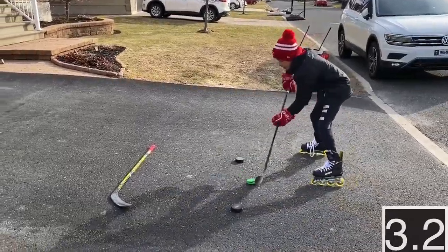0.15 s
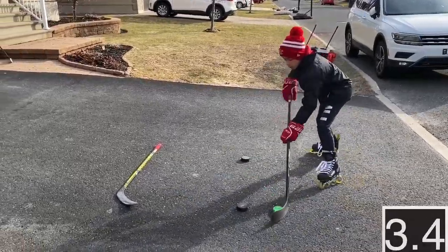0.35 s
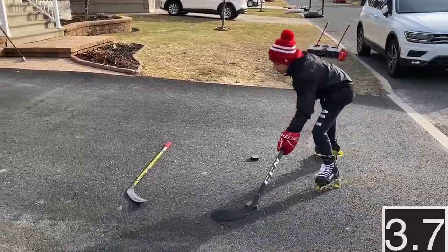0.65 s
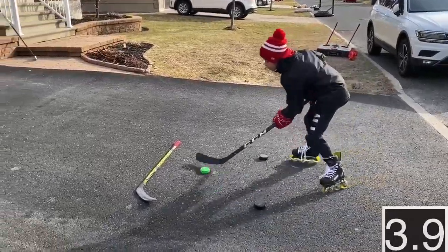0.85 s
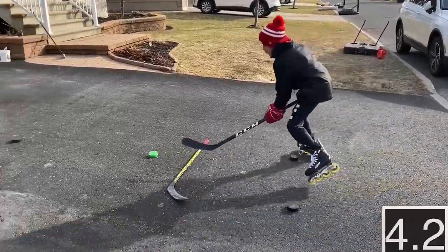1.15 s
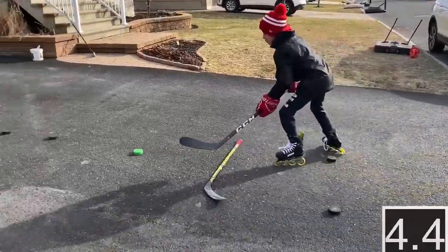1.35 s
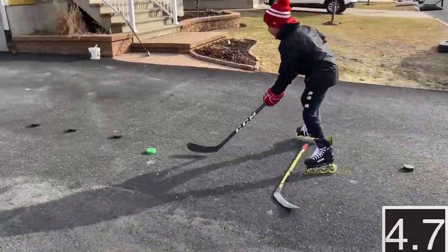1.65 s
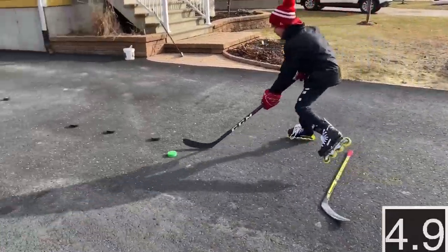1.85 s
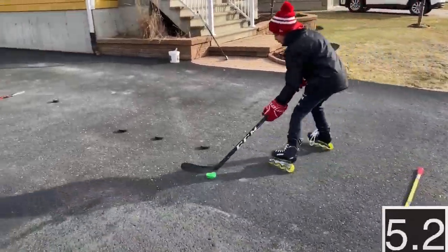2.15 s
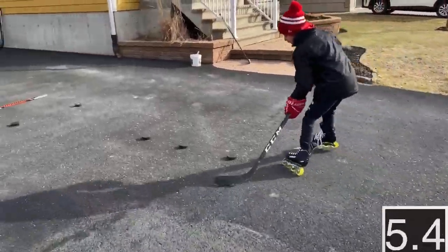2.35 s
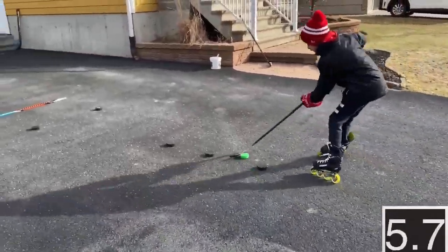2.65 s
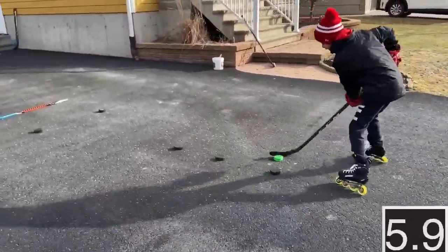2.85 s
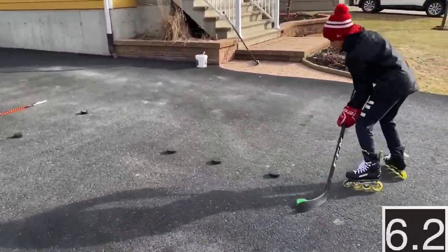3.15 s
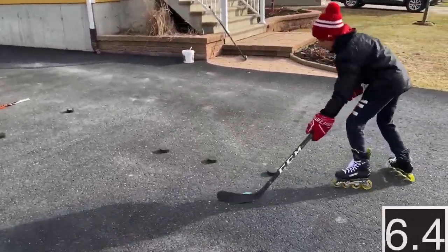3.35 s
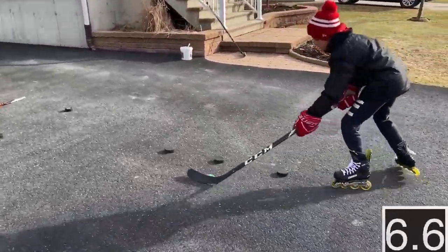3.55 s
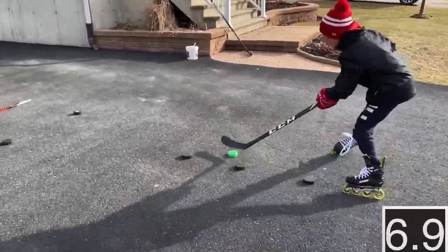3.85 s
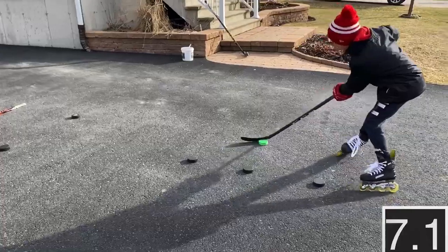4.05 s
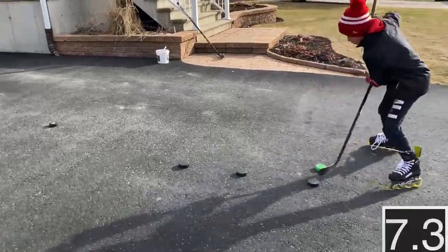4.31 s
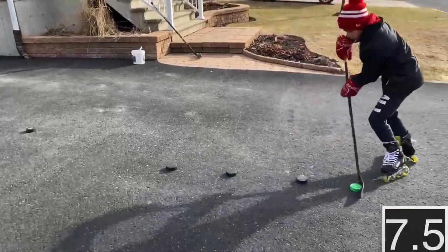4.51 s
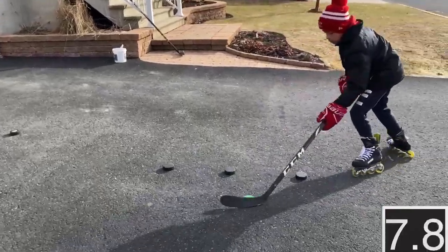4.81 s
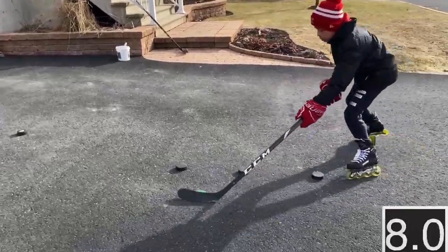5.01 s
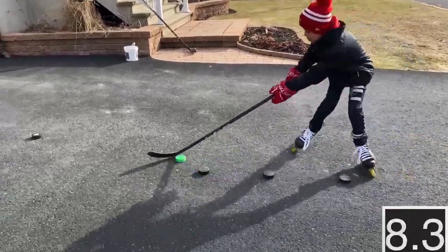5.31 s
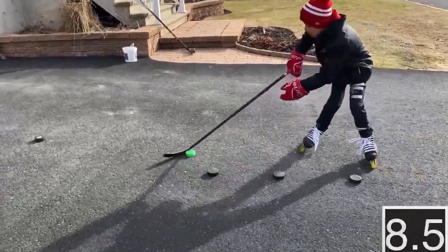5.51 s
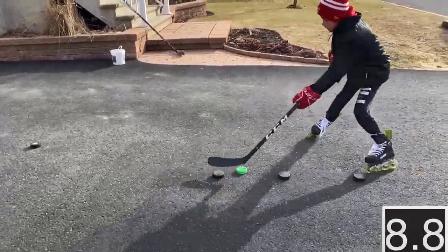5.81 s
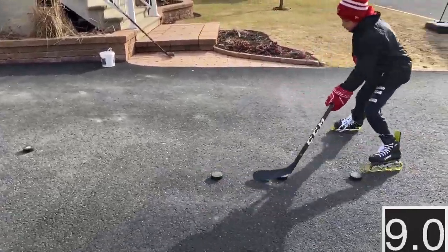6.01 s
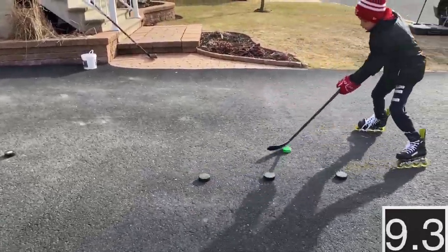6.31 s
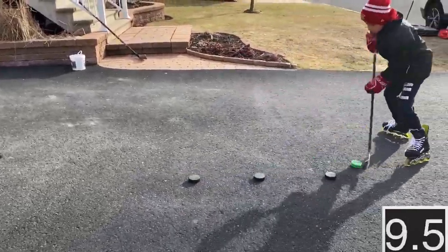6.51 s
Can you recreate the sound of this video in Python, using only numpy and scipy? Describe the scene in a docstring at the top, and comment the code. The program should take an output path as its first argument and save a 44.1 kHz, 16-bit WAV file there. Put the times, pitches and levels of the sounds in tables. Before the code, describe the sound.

Stickhandling on a paved driveway: uneven woody clacks and brighter plastic clicks, each with a tiny chatter of rebounds and a little grit, then skipping scrapes of the blade edge. Puck rattle continues quietly throughout. Wind puffs lightly, except for one booming double buffet near two seconds. The last moments bring a short loud rattle and a gritty crack. Close, dry outdoor sound on a handheld stereo phone.

```python
"""A loose plastic puck rattles over gritty asphalt, with faint wheel rumble and wind around it.
Blade, puck or both then knock and clack, and a skater's blade scrapes over the grit, a few metres from a
hand-held phone. Random contacts ring banks of resonances for puck, wheels, blade and grit; shaped noise
and short slaps make the gusts at the two microphone ports, and a noise tail makes a short echo.
"""
import sys
import numpy as np
from scipy import signal
from scipy.fft import rfft, irfft, next_fast_len
from scipy.io import wavfile
from scipy.ndimage import uniform_filter1d

SR = 44100
rng = np.random.default_rng(int(sys.argv[2]) if len(sys.argv) > 2 else 0)


def unload_audio(sound):
    """Save the sound as a 16-bit wav file, at the path given as the first command line argument."""
    columns = np.transpose(np.atleast_2d(sound))
    # keep every value between -1 and 1, then stretch to whole-number steps
    steps = np.round(np.clip(columns, -1, 1) * 32767)
    wavfile.write(sys.argv[1], SR, steps.astype(np.int16))


N = 294147

# Sliding puck, interpolated over time: start_s, rattle_db, grit_db
SLIDE = [(0.0, -39, -47.5), (.75, -40.5, -49.5), (.9, -52, -47), (1.07, -53, -66), (1.2, -42, -49.5),
         (1.6, -48, -56), (2.2, -45, -54), (2.95, -44, -48.5), (3.45, -43.5, -53), (4.25, -45, -47.5),
         (5.3, -40, -51.5), (5.85, -49.5, -58.5), (6.1, -44.5, -53), (6.29, -45.5, -52), (6.33, -30, -39.5),
         (6.41, -46.5, -45), (6.67, -60, -71)]
# Puck jolting over a stone: start_s, level_db
JOLTS = [(0.75, -17), (0.7622, -13), (0.7837, -18), (0.803, -26), (1.7954, -22.5), (1.88, -13.5),
         (2.498, -21.5), (2.9477, -16.5), (3.027, -23.5), (3.355, -16), (3.7673, -20.5), (4.146, -18),
         (4.1832, -17.5), (4.4054, -23), (5.0865, -17), (5.128, -20), (5.354, -20), (5.543, -28),
         (5.571, -22), (5.592, -22), (5.628, -26), (5.861, -24), (6.391, -23)]
# Wind on the ports, interpolated over time: start_s, level_db
GUSTS = [(0.0, -40), (0.45, -51.5), (0.52, -36), (0.69, -50), (0.8, -47), (1.28, -45), (1.62, -44.5),
         (1.78, -28), (1.97, -15), (2.01, -6), (2.035, -21), (2.06, -7), (2.12, -29.5), (2.3, -49),
         (2.64, -54.5), (2.77, -31), (2.87, -30.5), (2.93, -31), (2.97, -35), (3.02, -33.5), (3.06, -48),
         (3.53, -39.5), (3.6, -57), (4.03, -44), (5.11, -51), (5.16, -35), (5.23, -43.5), (5.68, -52.5),
         (5.84, -32), (5.96, -39), (6.02, -39), (6.08, -52.5), (6.67, -43.5)]
# Knocks of blade, puck or both: start_s, knock_db, then crack_db, puck_db, edge_db (all re knock, before
# the mix gains), pitch_hz (the struck spot sets which blade modes are loudest)
KNOCKS = [(.081, -34.5, 17, 24, 23.5, 630), (.172, 0, -11.5, 0, -35, 1330),
          (.176, -7, -7.5, 0.5, -30, 1800), (.235, -7.5, -2, 9.5, -24, 1200),
          (.539, -25, -30, -20, -13, 450), (.641, -9, -22, -12, -14, 1100),
          (0.653, -5.5, -27, 0.5, -13, 3700), (.669, -22, -20, -15, -10, 1900),
          (0.678, -14, -16, -17, 5, 2600), (0.829, 0.5, -17, -19, -8, 1720),
          (.854, -10, 2.5, 10.5, 13, 680), (1.095, -23, 6.5, 21.5, 27.5, 1000),
          (1.2, -30, 0, -1, 22.5, 1800), (1.297, -22.5, -34, -29, -25, 250), (1.67, -13, -17, 7, -29, 680),
          (1.712, -18.5, -27, -2, 5.5, 2000), (1.921, -7, -12, -28, -1.5, 1600),
          (2.174, 0, -16.5, -23, -8, 1350), (2.209, -1, -9, 1, -26, 960), (2.533, -10, -13, 0, -30, 1050),
          (2.561, -6, -7.5, 11, 6.5, 1660), (2.628, -9.5, -19.5, 2, -11, 3400),
          (3.074, -0.5, -16, -30, -27, 1870), (3.078, -1, -9.5, -24, -35, 1300),
          (3.125, 0.5, -8, -33, -35, 1170), (3.324, -15.5, -11, 9, -19, 1460),
          (3.328, -17.5, -17, 12, -23, 1300), (3.368, -22, -12, 14, -15, 890),
          (3.896, -3, -13.5, 4.5, -34, 950), (3.955, -6, -8.5, 4, -27, 1040),
          (4.343, -6, -10.5, -35, -22, 1060), (4.351, -11, -4.5, -18, -21, 800),
          (4.39, -19.5, -15, -24, -4, 360), (4.429, -5, -0.5, 9, -8, 1230), (5.272, -11, -1, 10, -25, 1300),
          (5.322, -10.5, -10, 10.5, -28, 1130), (5.904, -5, -8.5, 7, -32, 1900),
          (5.945, -8.5, -23, -8, -25, 1700), (5.985, -14.5, -29, -17, -25, 1200),
          (6.218, -7, -14, -33, -37, 1000), (6.262, -13, -1, 9, -22, 1000), (6.479, -25.5, 3.5, 3, 4, 1300),
          (6.552, -15.5, -9, -29, 2, 840), (6.565, -22.5, 0, -20, 6, 970), (6.577, -18.5, -13, -20, 3, 750),
          (6.593, -4, -4, -36, 3.5, 980)]
# Blade dragged over asphalt: land_s, lift_s, scrape_db, swell_db (rise up to the lift), grit_db (re scrape)
STROKES = [(0.231, 0.385, -41.5, 5.5, -4), (0.454, 0.678, -36.5, 17, -17), (0.827, 0.885, -31.5, 2, -13),
           (1.773, 1.898, -48.5, 11, -1.5), (2.194, 2.209, -36, 7, -12), (2.227, 2.299, -25, 1.5, -10),
           (2.62, 2.863, -40.5, 12, -10.5), (3.07, 3.121, -36, 1, -6.5), (3.152, 3.269, -34.5, 0.5, -8.5),
           (3.385, 3.448, -35, 4.5, -8), (3.489, 3.704, -34, 4, -8.5), (3.993, 4.122, -35.5, 14.5, -11.5),
           (3.931, 3.958, -46, 8, -10), (4.375, 4.409, -50, 18.5, -4), (4.452, 4.624, -36, 2.5, 1),
           (4.737, 4.848, -37.5, 2, -7), (4.855, 5.02, -33.5, 8, -12), (5.371, 5.485, -50, 11, -10),
           (5.902, 5.959, -33, 0.5, -6), (5.976, 6.02, -32, 1.5, -13), (6.313, 6.406, -52.5, 1, -7),
           (6.552, 6.585, -34.5, -13, 4), (6.606, 6.672, -40, -1, 3)]

# Resonances of each body: pitch_hz, width_hz, level_db (re the other modes)
PUCK_MODES = [(2185, 364, 12.5), (2465, 223, 15), (2534, 86, 14), (3830, 680, 4), (5090, 460, 4),
              (7220, 74, -2.5)]
GRIT_MODES = [(4184, 556, 7.5), (4920, 2900, 3.5), (8300, 2580, 5.5), (9730, 2780, 5.5), (10840, 2500, 3),
              (13340, 2600, -4.5)]
WHEEL_MODES = [(165, 300, -7), (305, 124, 2.5), (675, 440, 2.5), (1070, 2200, -6.5)]
WIND_MODES = [(44.6, 28.8, -2.5), (77, 47.2, -0.5), (142.3, 83, -5.5), (204.6, 127, -12.5),
              (298, 92, -20.5)]
# Sharp slaps of air within a gust: pitch_hz, width_hz, level_db
BUFFET_MODES = [(181, 146, 0), (332, 287, -6)]
BLADE_MODES = [(300, 124, 0), (570, 248, -2), (937, 305, -0.5), (1171, 208, 2.5), (1409, 306, 2),
               (1680, 380, -0.5), (2070, 375, -1), (3220, 470, -10), (4740, 440, -15)]
# Hard blade edge: pitch_hz, width_hz, level_db
EDGE_MODES = [(2720, 240, 0.5), (3130, 270, -1.5), (3655, 245, 4), (5300, 150, -25), (7330, 140, -13)]
# Brittle top of the crack: pitch_hz, width_hz, level_db
SNAP_MODES = [(13000, 1530, 0)]

# Phase between the ports: pitch_hz, left_lead_rad
PORT_PHASE = [(0, 0), (900, -.2), (1500, -.7), (3000, -1.6), (5500, -.5), (6700, .2), (8400, 2.6),
              (9500, 3.4), (12200, 6.3), (15000, 9.3)]
# Level between the ports: pitch_hz, left_minus_right_db
PORT_BALANCE = [(300, 1.5), (800, 2.5), (2400, 2.5), (4400, -2.5), (8000, 0.5)]

JOLT_GRIT_DB = -8
WHEELS_DB = -50.5
BUFFET_DB = -8  # slaps re gust
BUFFET_TOP_DB = -27.5  # slaps grow with the gust only up to this level; beyond it the gust deepens
CHATTER_T60_S, SPRAY_S = 0.032, 0.0059
SPOT_DB_PER_OCTAVE2 = 3  # blade modes away from the struck spot's pitch ring less
SPOT_DETUNE = 0.086  # the grip detunes the modes by this relative spread
LAND_DB, LAND_S = 8, 0.066  # the blade bites harder just after it lands
LIFT_DB, TRAIL_DB_PER_S = 15.5, 119  # the scrape drops at the lift, then trails away
HOPS_PER_S, HOP_S = 95, 0.0045  # mean skipping rate; decay time of each bite
SKIP_SHARE, SETTLE = 0.72, 0.55  # depth of the skipping; share of it lost along the stroke
GRIT_SWELL_DB = 3.5  # the hiss grows faster than the scrape as the blade gathers speed
BEARING_LOW_HZ, BEARING_HIGH_HZ, BEARING_RAD = 1950, 7180, 1
ECHO_T60_S, ECHO_DB, ECHO_TOP_HZ = 0.091, -14, 4100
DIP_HZ, DIP_SHARE = 2880, 0.26  # the phone hears less here
TOP_HZ = 16600


def undb(db):
    """Turn decibels into an amplitude factor."""
    return 10 ** (np.asarray(db) / 20)


def unit(x):
    """Scale a sound to an RMS level of 1."""
    return x / np.sqrt(np.mean(x ** 2))


def curve(rows):
    """Read the columns of a timed table at every sample, with straight lines between rows."""
    s, *columns = np.transpose(rows)
    return [np.interp(np.arange(N) / SR, s, c) for c in columns]


def smooth_twice(x, size):
    """Average over a sliding window, twice, for soft corners."""
    return uniform_filter1d(uniform_filter1d(x, size=size), size=size)


def ring(x, modes):
    """A body: resonances side by side with alternating sign; a lone click peaks near 1."""
    def body(v):
        total = 0
        for k, (hz, width_hz, db) in enumerate(modes):
            b, a = signal.iirpeak(hz, hz / width_hz, SR)
            total = total + (-1) ** k * undb(db) * signal.lfilter(b, a, v)
        return total
    return body(x) / np.abs(body(signal.unit_impulse(1 << 12))).max()


def clicks(per_s, spread_db, size=N):
    """Random contacts of either sign; a wide spread makes a few far stronger than the rest."""
    hit, strength, sign = rng.random((3, size))
    level = undb(-spread_db * np.log(1 - 0.98 * strength))
    return (hit < per_s / SR) * level * np.sign(sign - 0.5)


def walk(rate):
    """Random levels around zero, held 1 / rate s and slewed twice, with an RMS of 1."""
    hold = int(SR / rate)
    steps = np.repeat(rng.standard_normal(N // hold + 1), hold)
    return unit(smooth_twice(steps, hold)[:N])


def slide():
    """The two loose halves of the puck tick against each other over the bumps and kick up grit."""
    rattle_db, grit_db = curve(SLIDE)
    ticks = clicks(380, 4.2) * undb(3 * walk(45))
    grit = unit(ticks) + 2 * clicks(4300, 0.55)
    rattle = ring(ring(ticks, [(2520, 4700, 0)]), PUCK_MODES)
    jolts = np.zeros(N)
    for start_s, level_db in JOLTS:
        # three contacts within a few milliseconds
        jolts[int(start_s * SR) + np.array([0, 40, 110])] += undb(level_db) * np.array([1, -0.45, 0.3])
    jolts = ring(jolts, PUCK_MODES) + undb(JOLT_GRIT_DB) * ring(jolts, GRIT_MODES)
    return undb(rattle_db) * unit(rattle) + undb(grit_db) * unit(ring(grit, GRIT_MODES)) + jolts


def wheels():
    """Soft wheels roll over coarse asphalt: dense contacts ring low, broad modes."""
    rumble = unit(ring(clicks(2000, 4), WHEEL_MODES))
    return undb(WHEELS_DB + 2.5 * walk(13)) * rumble


def wind():
    """Eddies in quick puffs that press now on one port, now on the other."""
    shared, own = rng.standard_normal((2, N))
    sides = np.array([[1], [-1]])
    air = shared + 0.3 * own * sides
    eddies = ring(ring(air, [(88, 440, 0)]), WIND_MODES)
    gust_db = curve(GUSTS)[0]
    slap_db = BUFFET_DB + np.minimum(BUFFET_TOP_DB - gust_db, 0) + 4 * walk(40)
    slaps = undb(slap_db) * unit(ring(clicks(300, 3), BUFFET_MODES))
    puff_db = gust_db + 2.4 * walk(30) + 0.6 * walk(16) * sides
    return undb(puff_db) * (unit(eddies) + slaps)


def knocks():
    """Each is a first touch, one knock and a dying chatter of rebounds, into blade, edge, puck and grit."""
    blade, crack, puck, edge = np.zeros((4, N + SR))
    t = np.arange(SR // 8) / SR
    touch_lead = 30  # samples from the first touch to the knock
    for start_s, knock_db, crack_db, puck_db, edge_db, spot_hz in KNOCKS:
        fade = undb(knock_db - 60 * t / CHATTER_T60_S)
        push = 0.55 * clicks(450, 2.5, size=len(t))
        push[0], push[touch_lead] = 0.15, 1
        # every knock spends its whole energy
        push = push / np.sqrt(np.sum((push * fade / fade[0]) ** 2))
        force = fade * push
        # a brief spray of grit swells and dies
        spray_shape = (1 - np.exp(-t / 0.0022)) * np.exp(-(t / SPRAY_S) ** 4)
        spray = rng.standard_normal(len(t)) * spray_shape * undb(knock_db)
        first = int(start_s * SR) - touch_lead
        at = slice(first, first + len(t))
        detune = 1 + SPOT_DETUNE * rng.standard_normal(len(BLADE_MODES))
        spot_modes = []
        for (hz, width_hz, db), d in zip(BLADE_MODES, detune):
            spot_db = db - SPOT_DB_PER_OCTAVE2 * np.log2(hz / spot_hz) ** 2
            spot_modes.append((hz * d, width_hz, spot_db))
        blade[at] += ring(force, spot_modes)
        puck[at] += force * undb(puck_db)
        edge[at] += force * undb(edge_db)
        crack[at] += (0.69 * force + 0.081 * spray) * undb(crack_db)
    # the blade flexes, so its contact lasts a fraction of a millisecond
    blade = smooth_twice(blade, 7)
    rings = undb(2) * blade + undb(-5) * (ring(puck, PUCK_MODES) + ring(edge, EDGE_MODES))
    cracks = undb(9) * ring(crack, GRIT_MODES) + undb(6) * ring(crack, SNAP_MODES)
    return (rings + cracks)[:N]


def hop_bites():
    """The blade hops at uneven intervals, and each landing is a bite that dies fast."""
    gap, size = rng.random((2, N // 200))
    at = (np.cumsum(0.5 + gap) * SR / HOPS_PER_S).astype(int)
    hops = np.zeros(N)
    hops[at[at < N]] = 0.21 + size[at < N]
    decay = np.exp(-1 / (HOP_S * SR))
    return unit(signal.lfilter([1], [1, -decay], uniform_filter1d(hops, size=60)))


def drag():
    """The blade edge hops over the stones, catching at each landing; fine grit hisses under it."""
    scrape, hiss, skip = np.zeros((3, N))
    for land_s, lift_s, scrape_db, swell_db, grit_db in STROKES:
        t = np.arange(int(land_s * SR), N) / SR
        done = np.clip((t - land_s) / (lift_s - land_s), 0, 1)
        db = scrape_db + swell_db * done + LAND_DB * np.exp(-(t - land_s) / LAND_S)
        db = db - (t > lift_s) * (LIFT_DB + TRAIL_DB_PER_S * (t - lift_s))
        skip[-len(t):] = SKIP_SHARE * (1 - SETTLE * done)
        scrape[-len(t):] += undb(db)
        hiss[-len(t):] += undb(db + grit_db + GRIT_SWELL_DB * (done - 1))
    scrape, hiss = uniform_filter1d([scrape, hiss], size=300)
    bite = 1 - skip + skip * hop_bites()
    catch = clicks(2300, 3.6) * undb(1.3 * walk(110)) * bite
    grit = clicks(6000, 5.5) * undb(1.5 * walk(70)) * bite + 0.3 * catch
    # the blade rolls between heel and toe, so low or high modes lead
    lean = np.pi / 4 * (1 + np.tanh(1.15 * walk(16)))
    heel = unit(ring(ring(catch, [(1050, 1000, 0)]), BLADE_MODES))
    toe = unit(ring(ring(catch, [(1800, 1000, 0)]), BLADE_MODES))
    scraping = unit(np.cos(lean) * heel + np.sin(lean) * toe)
    hissing = unit(ring(grit, GRIT_MODES)) + undb(-3.5) * unit(ring(grit, EDGE_MODES))
    return scrape * scraping + hiss * hissing


def echo(near):
    """Ground, car and house front scatter a short echo, unlike at each port."""
    t = np.arange(SR // 4) / SR
    scatter = rng.standard_normal((2, len(t))) * undb(-60 * t / ECHO_T60_S)
    scatter = signal.sosfilt(signal.butter(1, ECHO_TOP_HZ, fs=SR, output="sos"), scatter)
    scatter = scatter / np.sqrt(np.sum(scatter ** 2) / 2)
    return undb(ECHO_DB) * signal.fftconvolve(near[None], scatter, axes=1)[:, :N]


def ports(x):
    """The phone body delays and shades the sound differently at its two ports."""
    size = next_fast_len(N)
    hz = np.fft.rfftfreq(size, 1 / SR)
    # each port takes half of the difference, in opposite directions
    half = np.exp(0.5j * np.interp(hz, *np.transpose(PORT_PHASE)))
    half = half * undb(np.interp(hz, *np.transpose(PORT_BALANCE)) / 2)
    both = rfft(x, size) * np.array([half, 1 / half])
    # in the presence band the phase between the ports swings with the bearing of the source
    band = 1 / (1 + (BEARING_LOW_HZ / (hz + 1)) ** 8) / (1 + (hz / BEARING_HIGH_HZ) ** 16)
    swing = BEARING_RAD / 2 * walk(7) * np.array([[1], [-1]])
    rest, real, turned = (irfft(both * part, size)[:, :N] for part in (1 - band, band, 1j * band))
    return rest + np.cos(swing) * real + np.sin(swing) * turned


def scene():
    """Mix puck, wheels, knocks and scrapes through the ports, then add their echo and the wind."""
    near = slide() + wheels() + knocks() + drag()
    return ports(near) + echo(near) + wind()


def record(dry):
    """The phone loses the deep bass and the top and rounds the loudest peaks."""
    x = signal.sosfilt(signal.butter(4, 40, "high", fs=SR, output="sos"), dry)
    x = x - DIP_SHARE * signal.lfilter(*signal.iirpeak(DIP_HZ, 6, SR), x)
    rounded = np.tanh(x) / 1.237
    x = signal.sosfilt(signal.butter(5, 15000, fs=SR, output="sos"), rounded)
    return signal.sosfilt(signal.ellip(8, 0.2, 70, TOP_HZ, fs=SR, output="sos"), x)


dry = scene()
out = record(dry)
unload_audio(out)
```